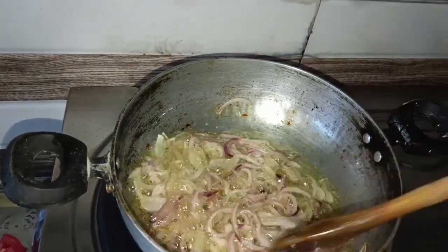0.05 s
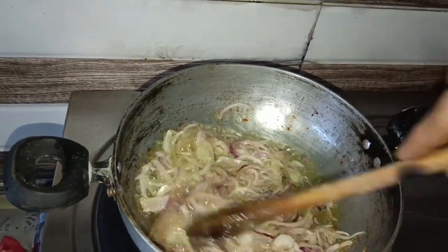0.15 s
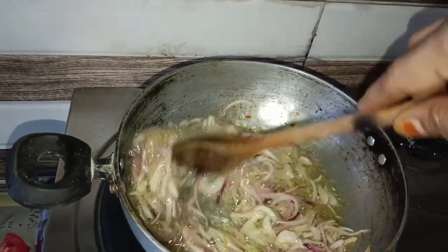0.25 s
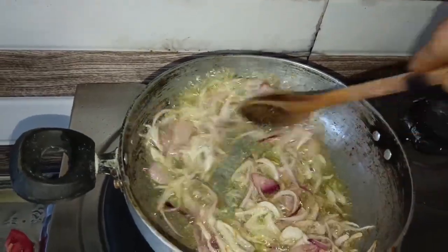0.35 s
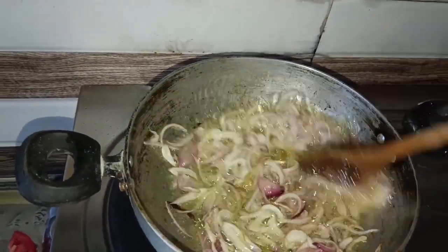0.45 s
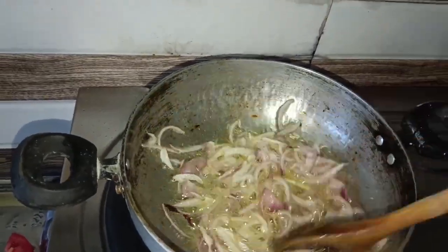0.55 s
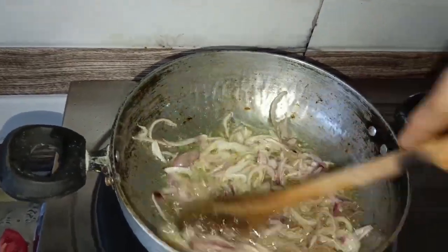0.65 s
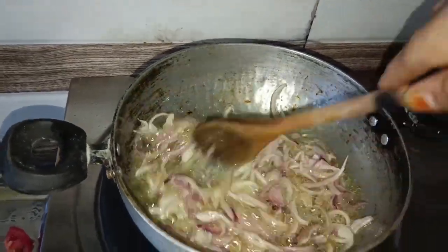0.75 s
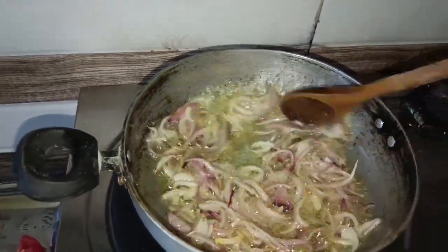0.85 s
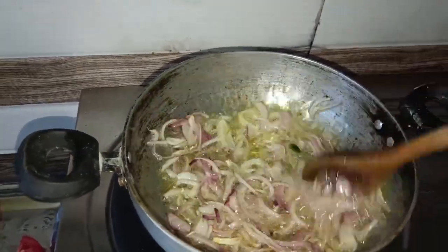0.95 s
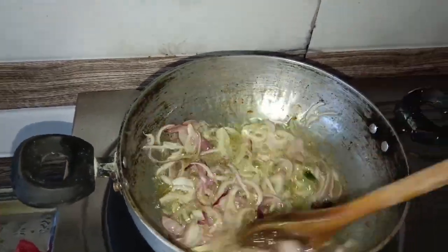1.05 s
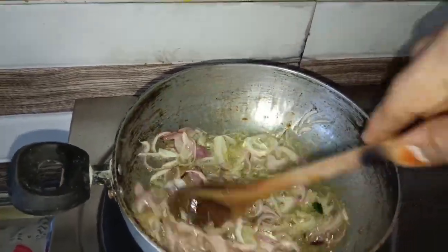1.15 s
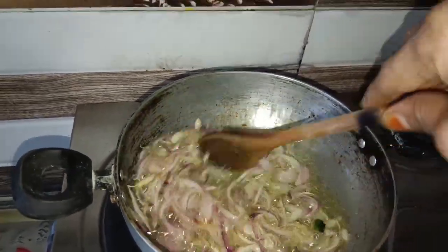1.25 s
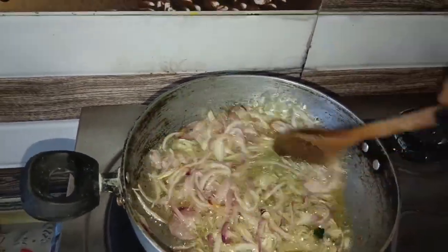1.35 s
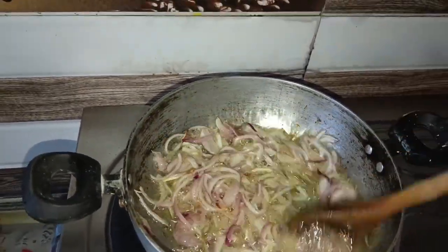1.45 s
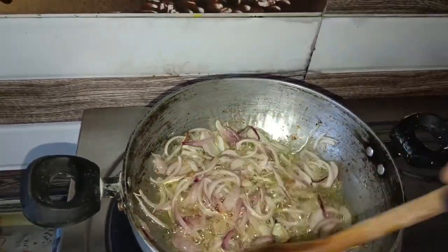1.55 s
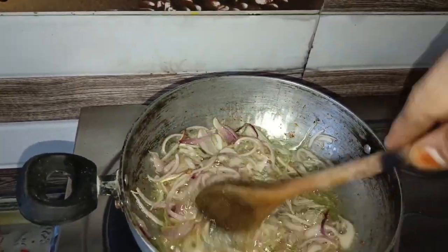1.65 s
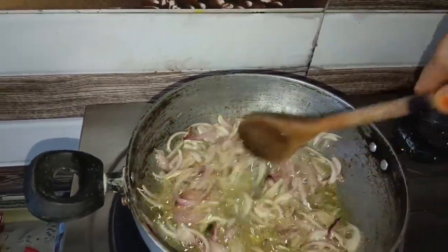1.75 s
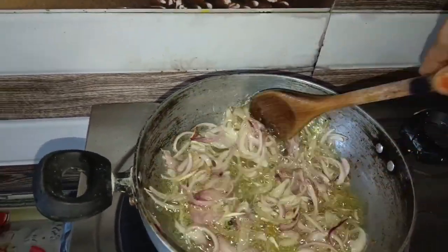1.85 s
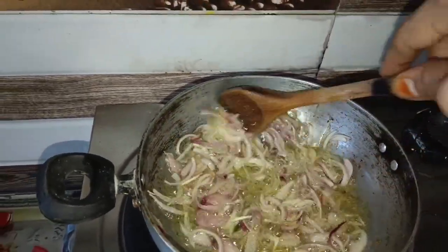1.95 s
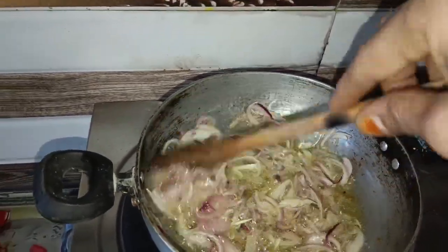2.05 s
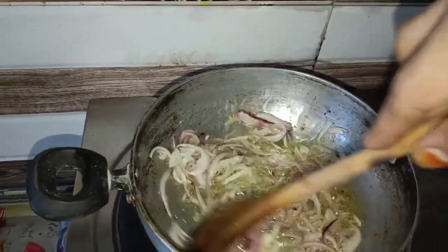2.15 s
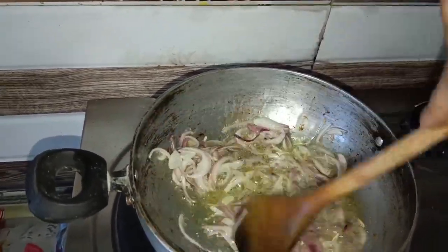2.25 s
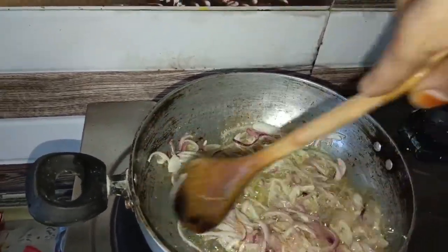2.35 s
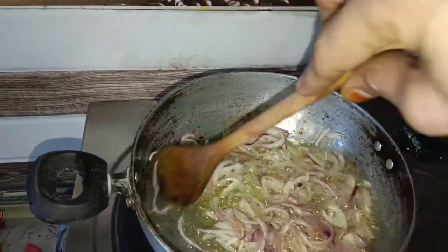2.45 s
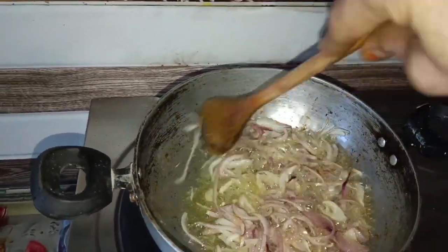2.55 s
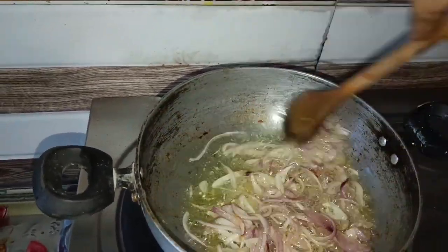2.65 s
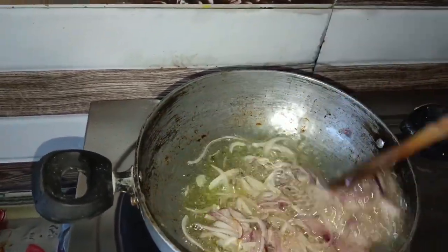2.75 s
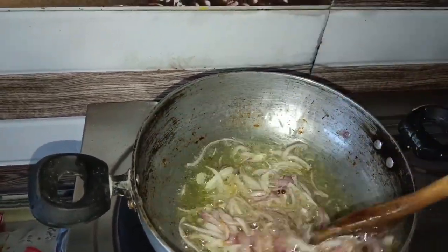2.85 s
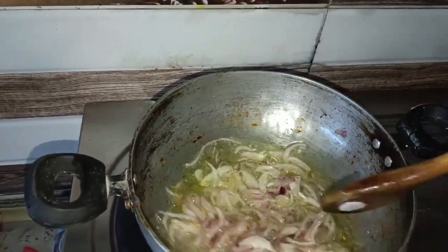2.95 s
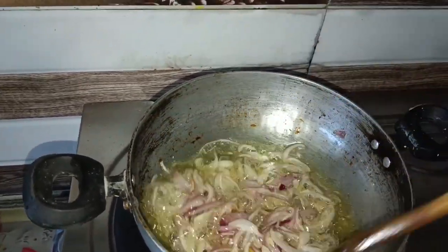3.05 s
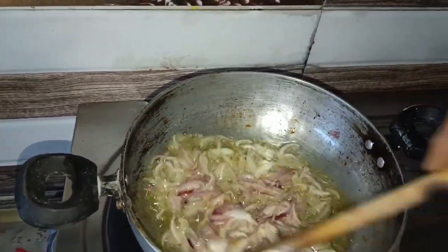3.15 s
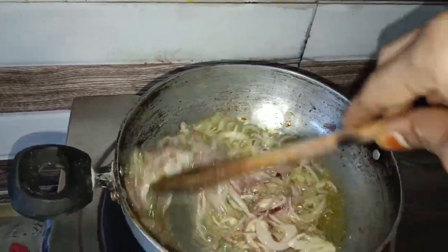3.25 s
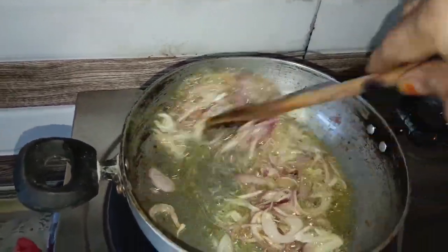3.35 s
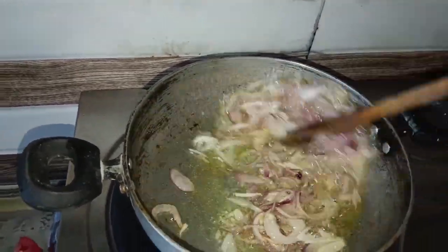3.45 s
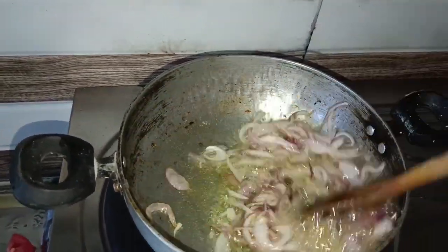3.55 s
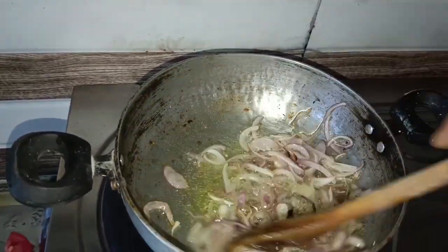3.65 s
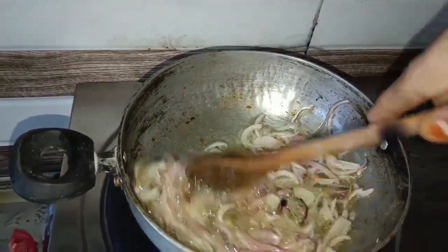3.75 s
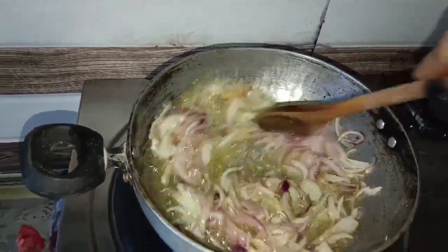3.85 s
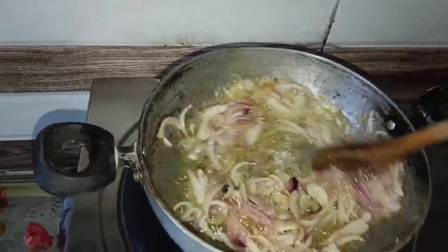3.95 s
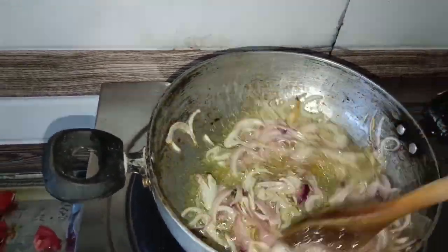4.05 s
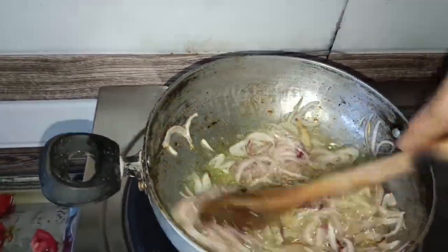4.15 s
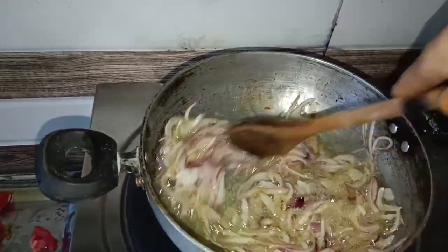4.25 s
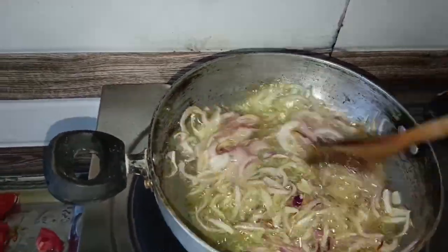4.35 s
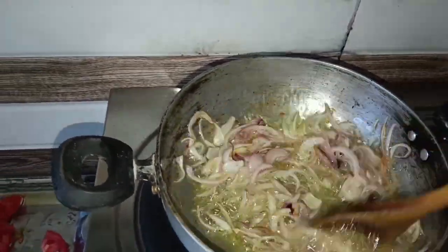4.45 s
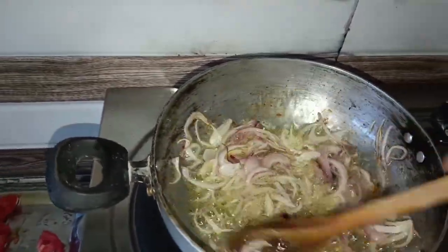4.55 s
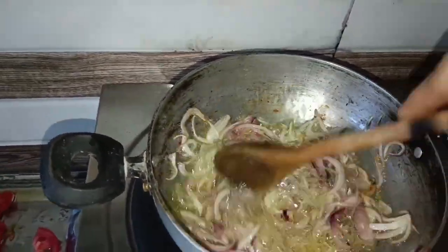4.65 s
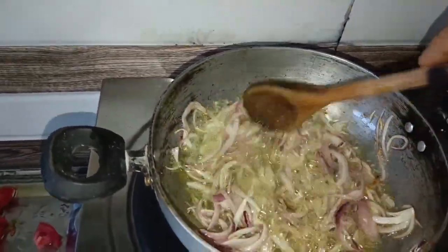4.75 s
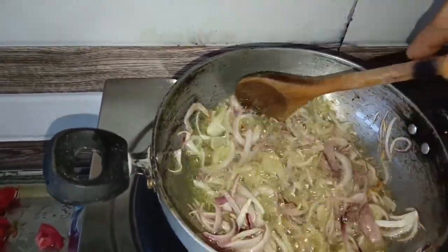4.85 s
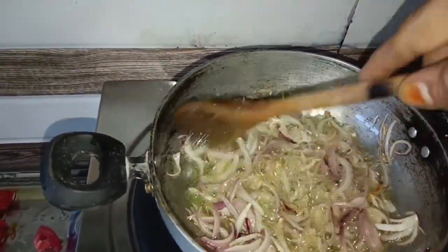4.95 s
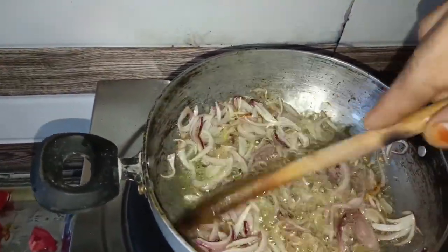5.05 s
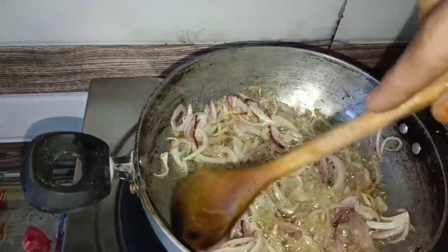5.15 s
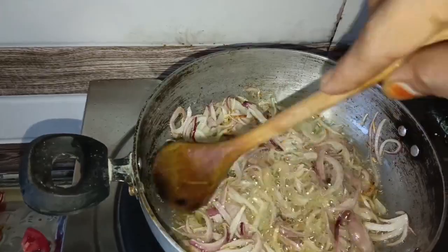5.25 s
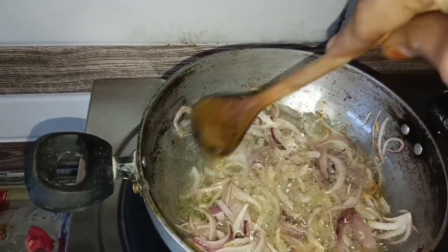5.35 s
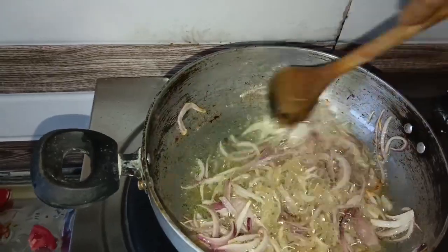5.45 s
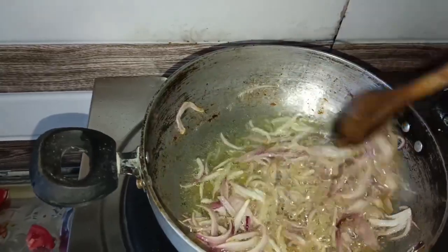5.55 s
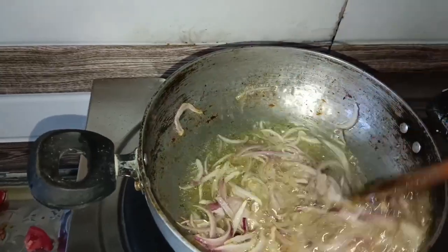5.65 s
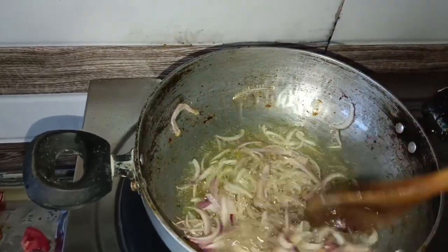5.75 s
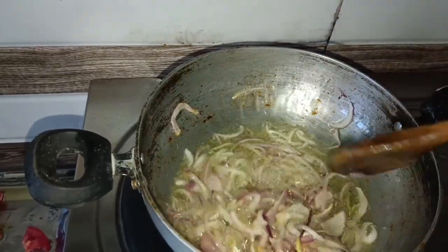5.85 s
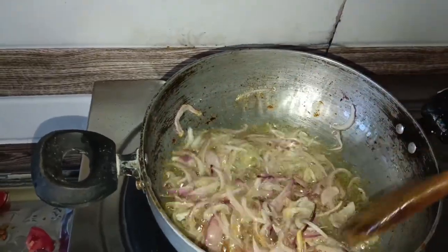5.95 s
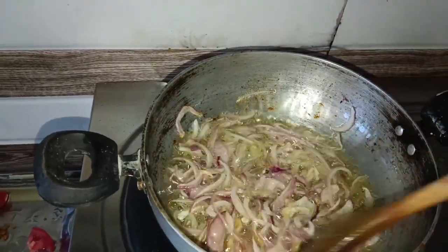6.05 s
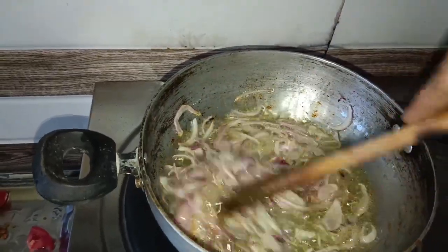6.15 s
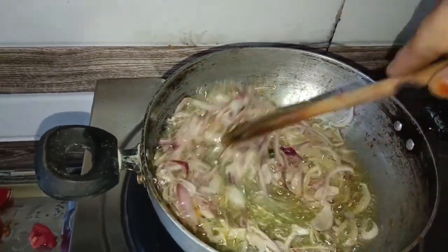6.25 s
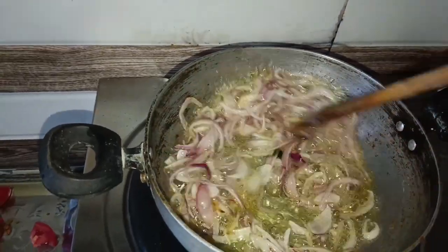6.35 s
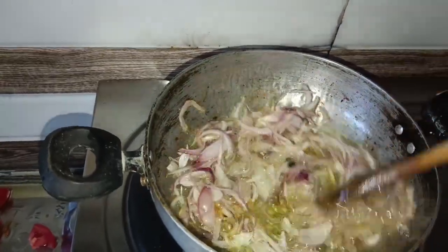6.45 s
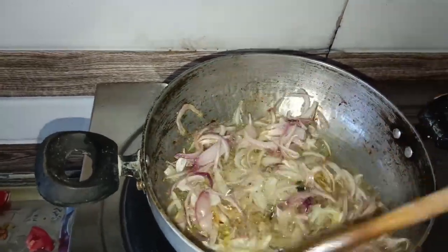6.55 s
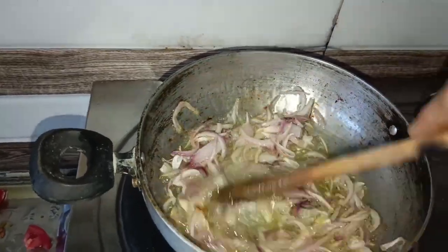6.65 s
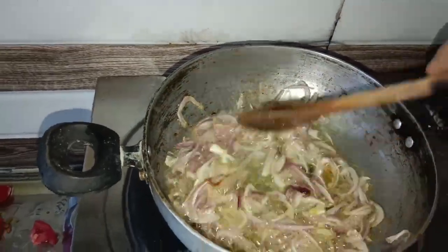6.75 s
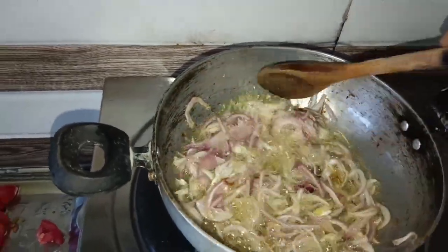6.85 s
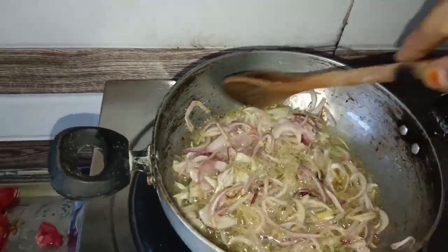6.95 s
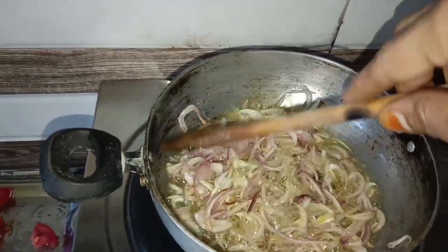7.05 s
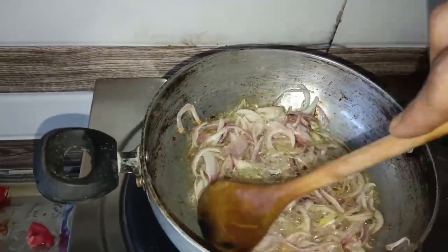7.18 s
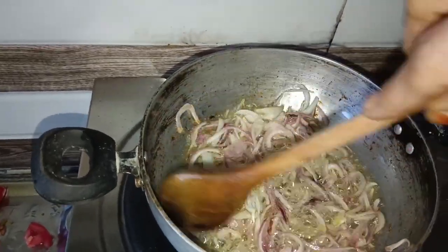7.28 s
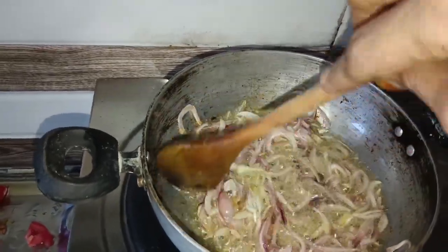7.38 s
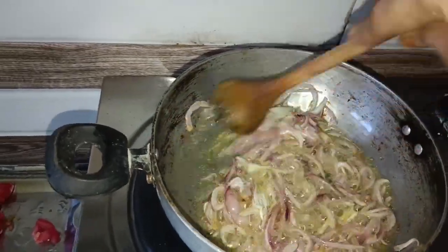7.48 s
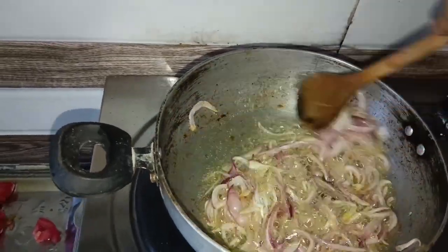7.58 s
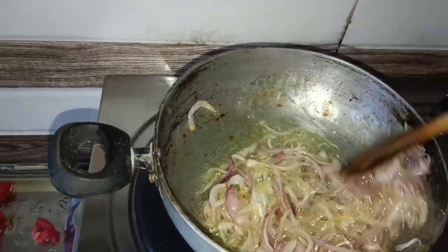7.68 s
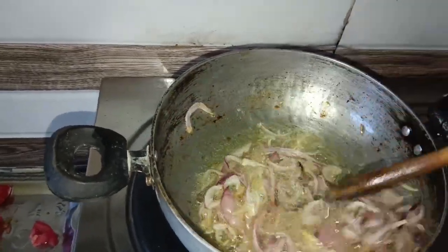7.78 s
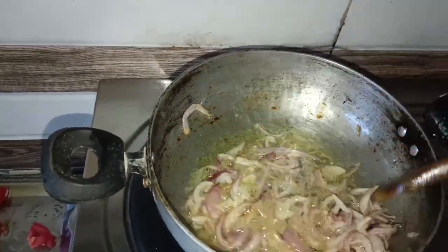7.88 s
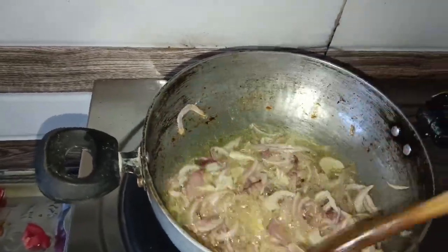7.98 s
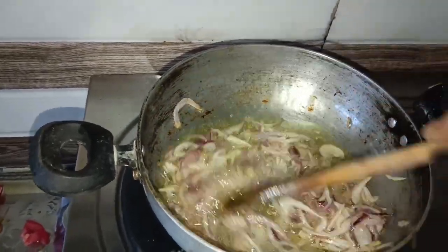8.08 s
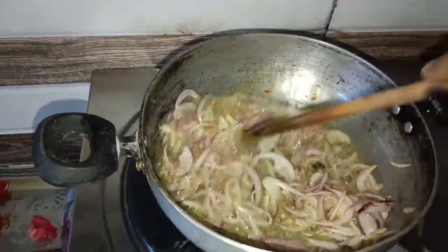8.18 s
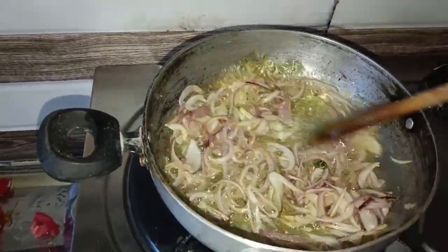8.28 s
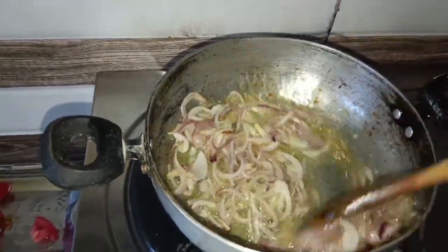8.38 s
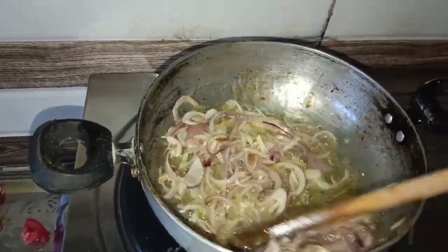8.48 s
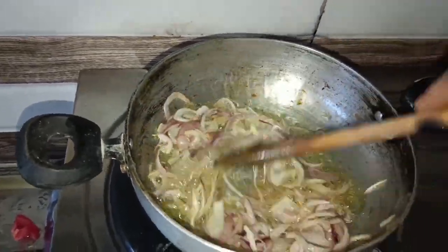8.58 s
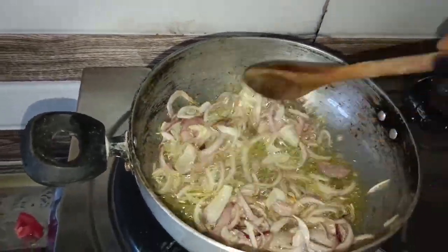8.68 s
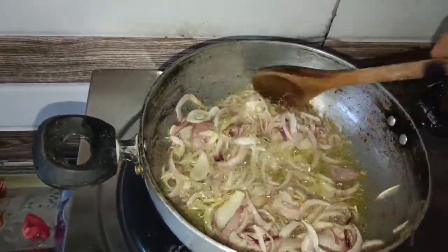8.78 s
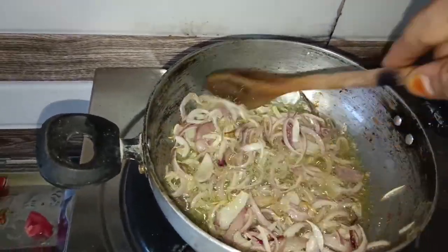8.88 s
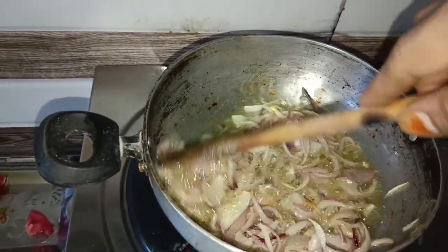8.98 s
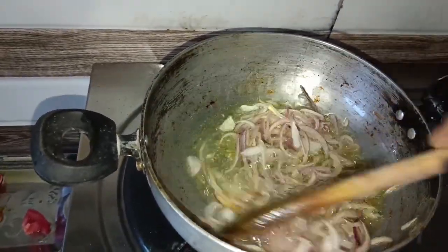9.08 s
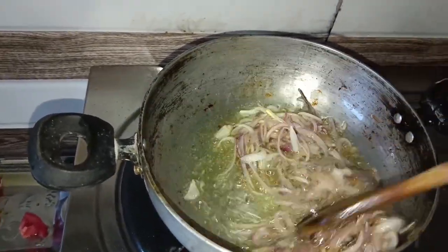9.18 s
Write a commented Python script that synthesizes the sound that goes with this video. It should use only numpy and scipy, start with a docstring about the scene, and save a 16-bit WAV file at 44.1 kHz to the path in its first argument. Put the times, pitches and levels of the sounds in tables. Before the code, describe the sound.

Onion slices fry close to the microphone in a tiled kitchen, with a constant fine, bright sizzle, crackles and small wet bubbling. From 0.3 s a wooden spoon rubs the oily pan, its hollow mid-pitched scrape recurring with each stroke; turned slices squelch and the hiss briefly swells. Sharp oil spits snap at 0.3-0.4 s, with others near 2.1, 2.9, 3.4, 4.0, 7.4 and 8.8. Around 2.1-2.3 s the pan clanks and rattles on its support, followed by a short rasp at 2.5. A soft tock comes at 3.8 and another rasp at 4.4. Stronger hollow wooden tocks land at 5.1 and 5.3, then a metallic clunk at 5.5. More clunks arrive at 7.2 and 7.55, with tocks at 7.1 and 8.3. Low, uneven rumbles accompany the pushes, over faint hum and dull room noise until the end.

```python
"""Onions frying in a metal pan

Sliced onions fry in oil on a stove, close to the microphone in a tiled kitchen. Random clicks stand for
tiny steam bursts and merge into the sizzle; larger drops spit as short noise bursts. A wooden spoon rubs
and taps the pan, as narrow resonances and hollow tocks, and turns wet slices that squelch and flare up.
The pushed pan rumbles as low resonant noise and clunks on its support as struck modes, over a faint
mains hum."""
import sys
import numpy as np
from scipy import signal
from scipy.fft import rfft, irfft
from scipy.io import wavfile
from scipy.ndimage import uniform_filter1d

SR = 44100
rng = np.random.default_rng(int(sys.argv[2]) if len(sys.argv) > 2 else 0)


def dump(signal):
    """Clip the signal to [-1, 1] and save it as 16-bit WAV at the path in sys.argv[1]."""
    limited = np.clip(np.atleast_2d(signal).T, -1, 1)
    pcm = np.round(limited * 32767).astype(np.int16)
    wavfile.write(sys.argv[1], SR, pcm)


N = 406602
TIME = np.arange(N) / SR
STROKE_ATTACK_S = 0.042  # the spoon sets off, both turning slices and rubbing


def sizzle(heat):
    """Countless steam bursts merge into a hiss; larger bubbles crackle out of it in irregular clusters."""
    # Wet slices set off a cluster of crackles. Each row: start in seconds, length in seconds, level in dB.
    flurry_rows = [(0.425, .06, -55), (0.962, 0.054, -45), (1.748, 0.03, -41.5), (2.745, 0.036, -46),
                   (5.058, 0.027, -43), (5.564, 0.056, -53), (6.07, .02, -48)]
    flicker = np.array([undb(.55 * walk(28) + .45 * walk(12)) for _ in range(2)])  # one for each port
    bursts = grains(14000, 3.5) * flicker * undb(.45 * walk(18))
    clusters = unit(undb(3.5 * walk(13)))
    crackle = clusters * undb(-8.5) * room(grains(420, 6), wet_db=-7, t60_s=.2)
    flurry = sum(undb(db) * envelope(start, length, attack_s=0.006, release_s=0.0077)
                 for start, length, db in flurry_rows)
    return ports(heat * (bursts + crackle) + flurry * grains(900, 2.2))


def ports(x):
    """Each microphone port hears the treble from the bowl of the pan with its own peaks and notches."""
    # Spectrum at the two ports. Each row: frequency in Hz, left in dB, right in dB (shape only).
    port_spectra = [(517, -31.5, -24.5), (2570, -21.5, -11.5), (3400, -17, -18), (3990, -41, -5),
                    (4250, -10.5, 1), (5410, -1.5, 2), (6220, -7.5, -9), (6940, 1, -8), (7500, 5.5, 6),
                    (9084, -1.5, -2), (9020, -31, -7), (9970, -9.5, 3.5), (10920, -15, -1),
                    (10850, -40, -3), (16100, -80, -21)]
    hz, left_db, right_db = np.transpose(port_spectra)
    left = colour(x[[0]], np.transpose([hz, left_db]))
    right = colour(x[[1]], np.transpose([hz, right_db]))
    return np.vstack([undb(2.03) * left, right])


def strokes():
    """Each stroke turns wet slices into the oil, which flares up: gains of slide and sizzle."""
    # The spoon turns slices over. Each row: start in seconds, length in seconds, relative level in dB.
    stroke_rows = [(0.329, 0.23, -50.5), (0.89, 0.18, -55), (1.424, 0.11, -53), (1.762, 0.22, -56),
                   (2.26, 0.13, -50), (3.17, 0.34, -59.5), (3.885, 0.75, -56), (4.706, 1.14, -60),
                   (6.106, 0.44, -58), (8.313, 0.17, -60.5), (8.79, 0.12, -60)]
    release_s = 0.047
    flare_attack_s, flare_release_s = 0.12, 0.11  # wet faces meet the hot oil, then dry off
    slide, heat_db = undb(-62.5), -45.44  # between strokes
    for start, length, db in stroke_rows:
        stroke = undb(db) * envelope(start, length, STROKE_ATTACK_S, release_s)
        slide = np.hypot(slide, stroke)
        flare_db = 2.7 / (1 + undb(-58 - db))  # the more slices turn, the more it flares
        heat_db = heat_db + flare_db * envelope(start, length, flare_attack_s, flare_release_s)
    return slide, undb(heat_db)


def spits():
    """A drop bursts with a millisecond snap and scatters droplets; some also crack lower, each by its own
    amount. One row is a spoon hitting the pan with a broad click."""
    # Oil spits, and at 0.3473 s a spoon hit with a broad click. Each row: start in seconds, level in dB, low
    # crack relative to the snap in dB, left minus right in dB.
    spit_rows = [(0.3048, -26, -24, 2), (0.3473, -16, -2.5, -2), (0.426, -23, -12, -2),
                 (2.074, -24.5, -21, 4), (2.894, -31.5, -28, 11), (3.357, -26, -30, 2),
                 (4.0202, -23, -19, -2), (7.396, -27.5, -9, 3), (8.813, -26.5, -22, 0)]
    # Spectrum of the low crack. Each row: frequency in Hz, level in dB (shape only).
    crack_spectrum = [(500, -38), (1000, -4), (2700, -2.5), (5000, -21), (14000, -63)]
    out, t = np.zeros((2, N)), TIME[:SR // 10]
    for start, db, crack_db, pan_db in spit_rows:
        burst = spread(rng.standard_normal((2, len(t))), -5) * np.exp(-t / .0005)
        droplets = grains(600, 3, size=len(t)) * np.exp(-t / .022)
        burst = burst + undb(-24) * droplets
        snap = ports(burst) + undb(crack_db) * colour(burst, crack_spectrum)
        snap *= undb(18.5) / np.linalg.norm(snap)  # equal energy before its own level
        sides_db = np.array([[pan_db], [-pan_db]]) / 2
        add(out, start + 0.00051, snap * undb(db + sides_db))
    return room(out, wet_db=-10, t60_s=.18)


def rubbing():
    """Wood sticks and slips on the oily wall, ringing one band that sinks: gives sound and pressure."""
    # The spoon drags on the metal. Each row: start in seconds, length in seconds, level in dB.
    rub_rows = [(0.292, 0.17, -45.5), (0.884, 0.37, -54.5), (1.76, 0.25, -51), (2.282, 0.108, -42.5),
                (2.73, 0.28, -51.5), (3.21, 0.24, -54), (3.716, 0.17, -47.5), (4.254, 0.28, -45.5),
                (4.668, 0.17, -50), (5.004, 0.25, -52.5), (5.552, 0.44, -49.5), (6.039, 0.31, -52),
                (6.706, 0.42, -53), (7.306, 0.71, -48), (8.113, 0.65, -52.5), (8.79, 0.37, -50)]
    note_hz, width_hz = 935.7, 89  # pan wall under the spoon; width of each of two equal resonances
    sag = .03  # share by which the note starts high and ends low
    press, slope = undb(-61), 0  # between rubs
    for start, length, db in rub_rows:
        effort = envelope(start, length, STROKE_ATTACK_S, release_s=.04)
        press = np.hypot(press, undb(db) * effort)
        slope = slope + effort * np.clip(1 - 2 * (TIME - start) / length, -1, 1)
    slips = spread(grains(2500, 4.9), -1.2)
    note = resonate(resonate(slips, note_hz, width_hz), note_hz, width_hz)
    return press * unit(bend(note, sag * slope + 0.011 * walk(10))), press


def stirring(press, slide):
    """Oil bubbles on, a little more where the spoon presses; turned slices squelch."""
    # Spectrum of sliding slices. Each row: frequency in Hz, level in dB (shape only).
    slice_spectrum = [(700, -18), (1900, 1), (2700, 3.5), (3500, 7), (4800, 10), (7000, -23.5)]
    chirps = gliding_chirps(rate=230, low_hz=1100, high_hz=2900, length_s=.065, glide=.02,
                            scatter_db=4, rough=.06)
    bubbles = spread(grains(2500, 5), -0.48)
    bubbling = unit(wall(chirps + undb(3.5) * bubbles))
    wet_clicks = spread(grains(1800, 4), -0.5)
    squelch = unit(colour(chirps + undb(2) * wet_clicks, slice_spectrum))
    bubbling_gain = np.hypot(undb(-50.5), undb(-6) * press)  # steady part and the part added by rubbing
    return bubbling_gain * bubbling + undb(5.5) * slide * squelch


def gliding_chirps(rate, low_hz, high_hz, length_s, glide, scatter_db, rough):
    """Short, rough, gliding chirps at random pitches, used in both the bubbling and the squelch."""
    out = np.zeros((2, N))
    for when, pitch, span, phase in rng.random((int(rate * N / SR), 4)):
        t = np.linspace(-1, 1, int(length_s * (.5 + span) * SR))  # from end to end of the chirp
        tilt, size = rng.standard_normal(2)
        hz = low_hz * (high_hz / low_hz) ** pitch * (1 + glide * tilt * t)
        jitter = rough * np.cumsum(rng.standard_normal(len(t)))
        angle = 2 * np.pi * np.cumsum(hz) / SR + jitter
        lag = np.array([[0], [2 * np.pi * phase]])  # between the ports
        chirp = np.cos(np.pi * t / 2) * np.sin(angle + lag)
        add(out, when * N / SR, undb(scatter_db * min(size, 1)) * chirp)
    return unit(out)


def wall(x):
    """The ringing bands of the pan glide as the food shifts over them."""
    # Hollows of the pan that the bubbling rings. Each row: frequency in Hz, width of each of two
    # equal resonances in Hz, level in dB.
    hollows = [(1314, 152, 9), (1516, 250, 5.5), (1933, 140, -3.5)]
    out = 0
    for hz, width_hz, db in hollows:
        band = resonate(resonate(x, hz, width_hz), hz, width_hz)
        out = out + undb(db) * bend(band, .028 * walk(5))
    return out


def rasps():
    """The wooden edge sticks and slips fast in a rough, narrow note that sinks as it moves."""
    # The spoon's edge catches. Each row: start in seconds, length in seconds, opening pitch in Hz,
    # level in dB.
    rasp_rows = [(0.512, 0.028, 2090, -48), (2.539, 0.045, 1002, -40.5), (4.374, 0.065, 1720, -46.5)]
    out, t = np.zeros((2, N)), TIME[:SR // 4]
    for start, length, hz, db in rasp_rows:
        slips = spread(grains(1500, 3.3, size=len(t)), -7)
        width_hz = 0.056 * hz
        note = unit(resonate(resonate(slips, hz, width_hz), hz, width_hz))
        note = bend(note, -.5 * t)
        fade = np.minimum(t / 0.0045, 1) * np.exp(-np.maximum(t - length, 0) / 0.042)
        add(out, start, undb(db) * note * fade)
    return out


def taps():
    """The soft wooden bowl gives a hollow tock of a few cycles, then skids briefly on the ringing wall."""
    # Spoon taps on the pan. Each row: time in seconds, tock level in dB, half length of contact in seconds.
    tap_rows = [(3.8, -34, 0.0029), (5.103, -22, 0.0011), (5.345, -21, 0.0019), (7.116, -24, 0.0021),
                (8.336, -27, 0.0013)]
    tock_hz = 1016
    out, t = np.zeros((2, N)), TIME[:SR // 6] - .01  # contact is strongest at t = 0
    for when, db, width_s in tap_rows:
        tock = np.exp(-(t / width_s) ** 2 / 2) * np.sin(2 * np.pi * tock_hz * t)
        slips = grains(1800, 8.5, size=len(t))
        narrow = unit(resonate(slips, tock_hz, 47))
        broad = unit(resonate(resonate(slips, 1400, 820), 1340, 820))
        skid = (undb(-14.0) * narrow + undb(-23.0) * broad) * np.exp(-t / 0.058) * (t > 0)
        add(out, when + t[0] + 0.002065, undb(db) * (tock + skid))
    return room(out, wet_db=-8, t60_s=.25)


def clunks():
    """The pan meets its support with a clack and a thud; the metal swells into a ring and chatters."""
    # The pan tips, lands and settles on its support. Each row: start in seconds, then relative levels
    # in dB of the thud, the hard clack and the metal ring.
    clunk_rows = [(2.138, -28.5, -32, -22), (2.15, -32, -22.5, -21), (2.198, -30.5, -55, -31),
                  (2.257, -25, -21, -19.5), (2.271, -25.5, -25, -24), (2.312, -29, -33, -27.5),
                  (2.598, -37, -32.5, -36.5), (2.641, -46, -40, -44), (3.106, -46.5, -58, -53),
                  (3.811, -43.5, -65, -61), (5.082, -42.5, -30, -39), (5.105, -37, -28, -47),
                  (5.461, -27, -24, -21), (5.472, -35, -19, -24), (5.512, -31, -50, -30.5),
                  (7.226, -25, -22, -21.5), (7.244, -45, -32, -29.5), (7.27, -28.5, -41, -28),
                  (7.399, -39, -39, -36), (7.551, -31, -20, -19.5), (7.566, -29, -21.5, -26.5),
                  (7.592, -28.5, -47, -32), (7.985, -49, -62, -65)]
    # Modes of the heavy support, the hard point of contact and the metal pan.
    # Each row: frequency in Hz, relative level in dB.
    support_modes, contact_modes, pan_modes = [(147, -11.5), (238, -6), (262, -5), (285, 2), (313, 1.5),
                                               (335, 4)], [(330, -7.5), (860, -4), (1560, 4.5),
                                                                (1950, 2), (2330, -7)], [(457, 4), (511, 0),
                                                                               (549, -3), (598, 2),
                                                                               (638, 2), (711, -2),
                                                                               (810, -10), (866, 5.5),
                                                                               (966, 2), (1347, -0.5),
                                                                               (1567, -9), (1940, 3.5)]
    # Spectrum of the metal clatter. Each row: frequency in Hz, level in dB (shape only).
    clatter_spectrum = [(40, -66), (180, 1), (400, 6), (720, 4), (900, 9), (1170, 2.5), (1550, 6.5),
                        (1750, 0.5), (1960, 2), (2400, -1.5), (3300, -6.5), (5000, -7), (6200, -13.5),
                        (8000, -11), (14000, -48)]
    out, t = np.zeros((2, N)), TIME[:SR // 3]

    def rise(time_s):
        """Contact builds up towards full strength."""
        return 1 - np.exp(-t / time_s)

    for start, thud_db, clack_db, ring_db in clunk_rows:
        thud = strike(support_modes, t, 0.21, -22) * rise(0.0027)
        clack = strike(contact_modes, t, 0.023, -5) * rise(0.00087)
        rattle = spread(grains(1500, 0.68, size=len(t)), -1.2) * np.exp(-t / 0.036)  # loose, after the knock
        chatter = colour(rattle, clatter_spectrum)
        metal = (strike(pan_modes, t, 0.12, -3.4) + undb(-2.5) * chatter) * rise(0.0082)
        add(out, start, undb(thud_db + 2.0) * thud + undb(clack_db + 2.5) * clack + undb(ring_db) * metal)
    return room(out, wet_db=-10, t60_s=.22)


def strike(modes, t, t60_s, side_db):
    """Modes rung by one blow, starting near rms 1; each blow lands a little differently."""
    hz, db = np.transpose(modes)[:, :, None]
    t60 = t60_s * (hz.mean() / hz) ** .25  # higher modes die sooner
    gain = undb(db + 2 * rng.standard_normal(hz.shape))
    hz = hz * (1 + .005 * rng.standard_normal(hz.shape))
    phase = 2 * np.pi * rng.random((2, len(hz), 1))
    ring = np.sum(gain * undb(-60 * t / t60) * np.sin(2 * np.pi * hz * t + phase), axis=1)
    return spread(ring, side_db) * np.sqrt(2 / np.sum(gain ** 2))


def shudder():
    """The pushed pan shakes the stove top at its low resonances, in uneven lumps."""
    # Pushes of the pan. Each row: start in seconds, length in seconds, relative level in dB.
    push_rows = [(0.106, 0.061, -44.5), (0.596, 0.21, -50.5), (0.95, 0.2, -42.5), (1.44, 0.28, -44.5),
                 (1.91, 0.05, -43.5), (2.657, 0.46, -45.5), (3.245, 0.18, -43), (3.69, 0.24, -45),
                 (4.024, 0.43, -49), (4.598, 0.29, -50), (4.97, 0.17, -38), (5.389, 0.37, -41.5),
                 (6.02, 0.17, -37.5), (6.83, 0.15, -46), (7.174, 0.089, -41.5), (7.56, 0.76, -42.5),
                 (8.561, 0.074, -40)]
    push = sum(undb(db) * envelope(start, length, attack_s=0.034, release_s=0.017)
               for start, length, db in push_rows)
    shake = spread(rng.standard_normal((2, N)), -17.0)
    shake = resonate(resonate(resonate(shake, 80, 18), 103, 14), 96, 70)
    swell = np.sqrt(uniform_filter1d(np.mean(shake ** 2, axis=0), SR // 11))
    idle = undb(-61 + 5.9 * walk(20))  # between pushes
    return np.hypot(undb(-2) * push, idle) * shake / swell  # the noise's own slow swells are levelled


def kitchen():
    """A faint mains hum, one steady sine, over dull background noise."""
    # Spectrum of the background. Each row: frequency in Hz, level in dB (shape only).
    air_spectrum = [(25, -4), (90, -20.5), (150, 3.5), (220, -5), (550, -11.5), (2000, -27.5), (8000, -49)]
    mains_hz = 100
    noise = spread(rng.standard_normal((2, N)), -6.5)
    air = colour(noise, air_spectrum) * undb(1.75 * walk(9.4))
    return undb(-60.5) * air + undb(-61.5) * np.sin(2 * np.pi * mains_hz * TIME)


def room(x, wet_db, t60_s):
    """Tiles close behind the pan return a dense, short tail, different at each port."""
    t = TIME[:SR // 2]
    tail = rng.standard_normal((2, len(t))) * undb(-60 * t / t60_s) * (t > .003)
    tail /= np.linalg.norm(tail, axis=1, keepdims=True)
    return x + undb(wet_db) * signal.fftconvolve(x, tail, axes=1)[:, :N]


def undb(db):
    """Decibels to gain."""
    return 10 ** (np.asarray(db) / 20)


def unit(x):
    """Scale to rms 1."""
    return x / np.sqrt(np.mean(x ** 2))


def add(out, start_s, sound):
    """Mix a sound in at a time."""
    i = max(int(start_s * SR), 0)
    out[:, i:i + sound.shape[-1]] += sound[..., :N - i]


def envelope(start_s, length_s, attack_s, release_s):
    """Rise around the start, hold for the length, then die away."""
    rise = np.clip((TIME - start_s) / attack_s + .5, 0, 1)
    return rise * np.exp(-np.maximum(TIME - start_s - length_s, 0) / release_s)


def walk(rate):
    """Smooth random wander of rms 1, with a new target at a rate in Hz."""
    k = max(int(SR / rate), 2)
    steps = np.repeat(rng.standard_normal(N // k + 1), k)
    return unit(uniform_filter1d(steps, k)[:N])


def grains(rate, scatter_db, size=N):
    """Two trains of random clicks, at a rate per second, most of them small."""
    present = rng.random((2, size)) < rate / SR
    strength = undb(scatter_db * np.minimum(rng.standard_normal((2, size)), 3))
    sign = rng.choice([-1, 1], (2, size))
    return unit(present * strength * sign + 1e-12)


def spread(pair, side_db):
    """Two unrelated signals as the mid and side of one source."""
    side = undb(side_db) * pair[1]
    return np.array([pair[0] + side, pair[0] - side]) / np.hypot(1, undb(side_db))


def resonate(x, hz, width_hz):
    """One resonance, gain 1 at its centre."""
    return signal.lfilter(*signal.iirpeak(hz, hz / width_hz, fs=SR), x)


def bend(x, share):
    """Raise or lower the pitch of a steady sound by a share that changes in time."""
    i = np.arange(x.shape[1])
    position = (i + np.cumsum(share)) % i[-1]  # read faster or slower, wrapping at the ends
    return np.array([np.interp(position, i, port) for port in x])


def colour(x, points, size=2048):
    """Causal filter through (Hz, dB) points, with unit power gain."""
    hz, db = np.transpose(points)
    f = np.maximum(np.fft.rfftfreq(size, 1 / SR), 1)
    cepstrum = irfft(np.log(undb(np.interp(np.log(f), np.log(hz), db))))
    cepstrum[1:size // 2] *= 2  # folded onto positive time: minimum phase
    cepstrum[size // 2 + 1:] = 0
    h = irfft(np.exp(rfft(cepstrum)))
    return signal.fftconvolve(x, h[None] / np.linalg.norm(h), axes=1)[:, :x.shape[1]]


def scene():
    """Everything at the stove."""
    slide, heat = strokes()
    rub, press = rubbing()
    frying = sizzle(heat) + spits()
    spoon = rub + stirring(press, slide) + rasps() + taps()
    return frying + spoon + clunks() + shudder() + kitchen()


def record(dry):
    """The recorder cuts the top with a steep low-pass at 15400 Hz."""
    return signal.sosfilt(signal.ellip(8, .2, 70, 15400, fs=SR, output="sos"), dry)


dry = scene()
out = record(dry)
dump(out)
```